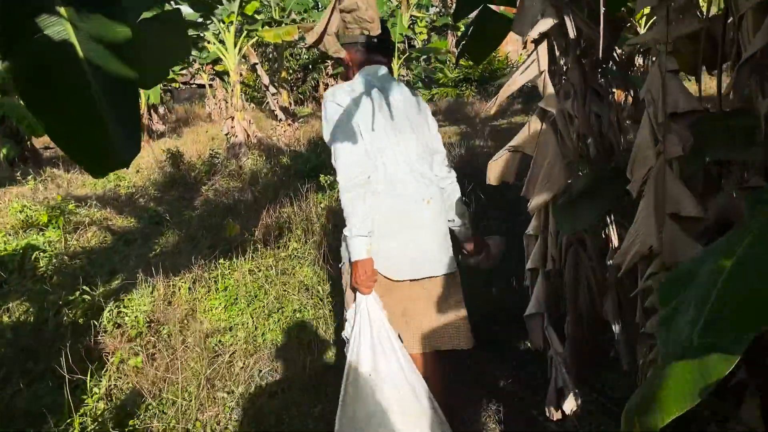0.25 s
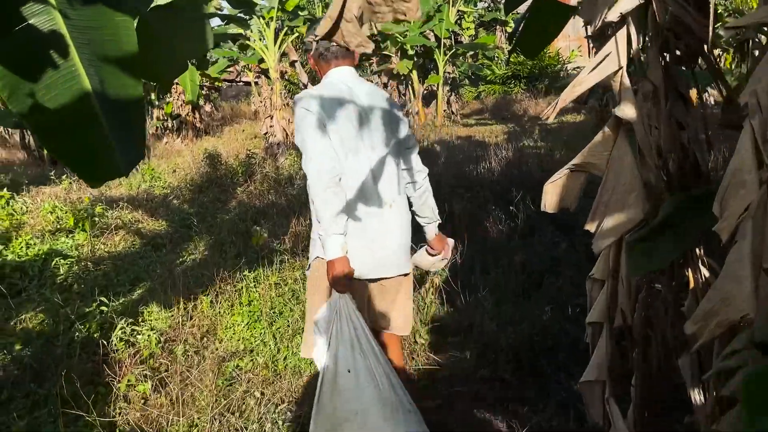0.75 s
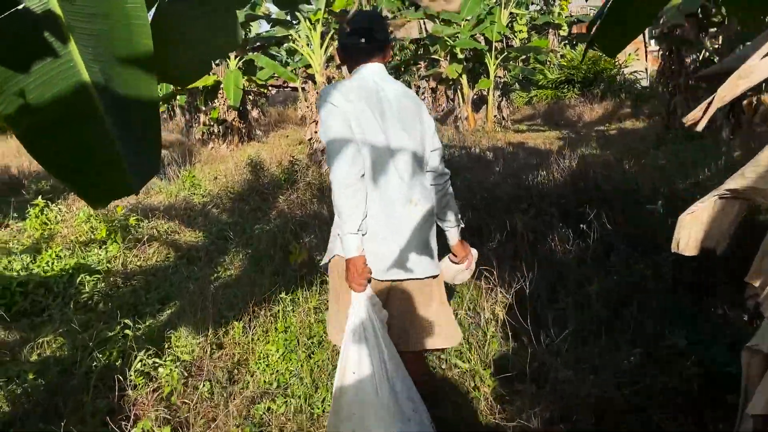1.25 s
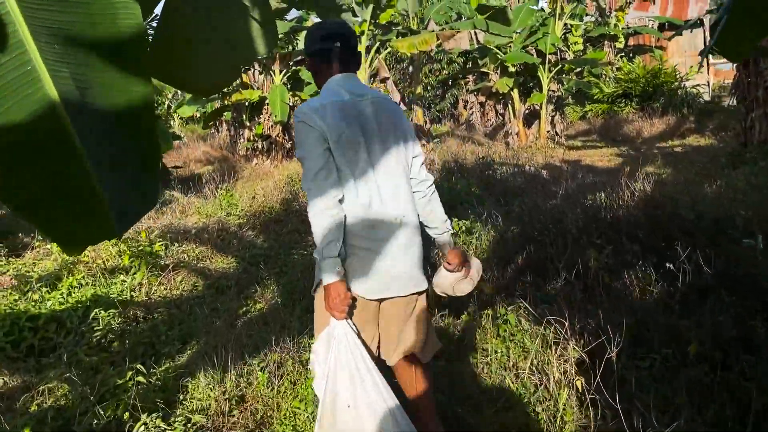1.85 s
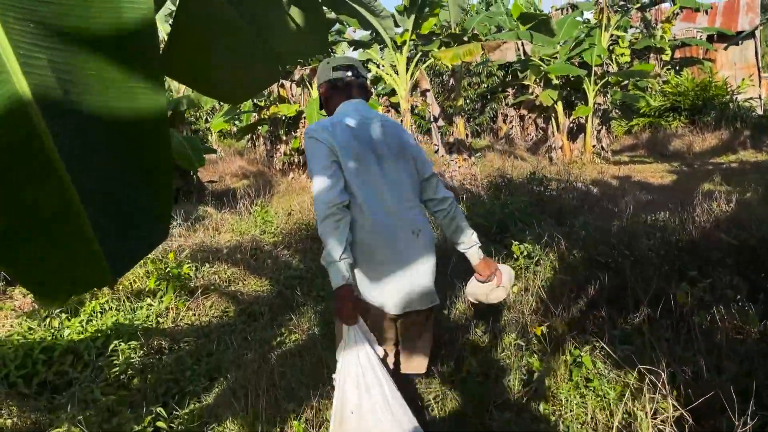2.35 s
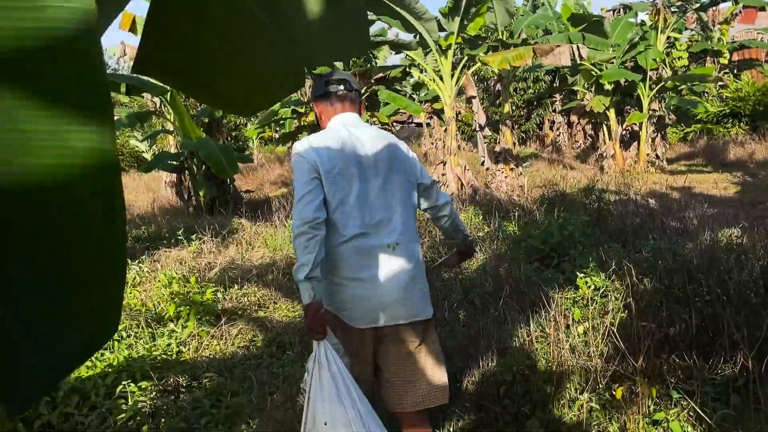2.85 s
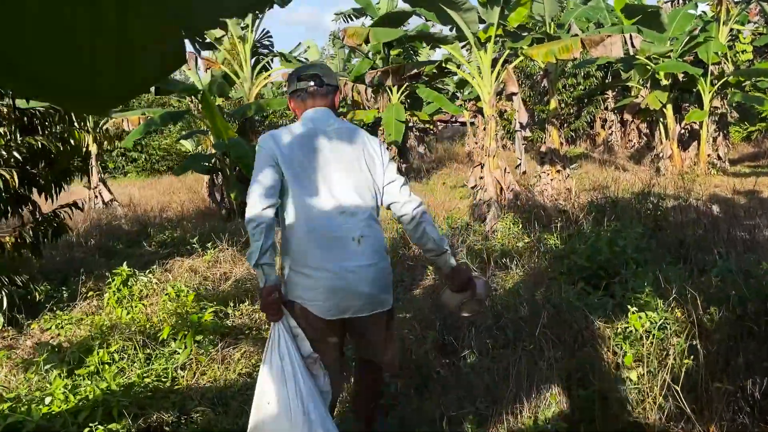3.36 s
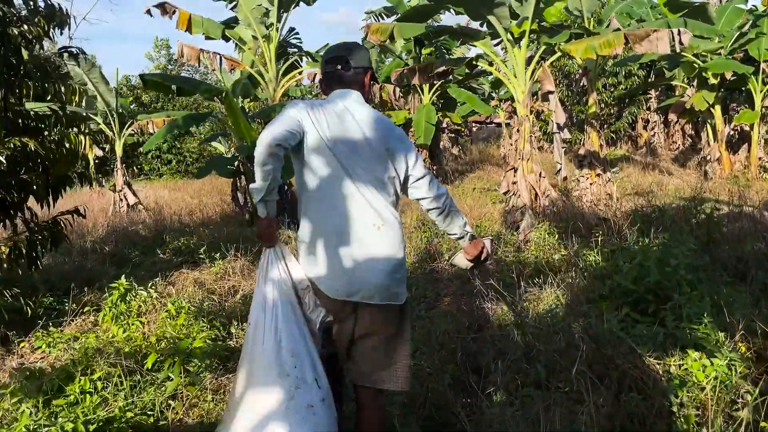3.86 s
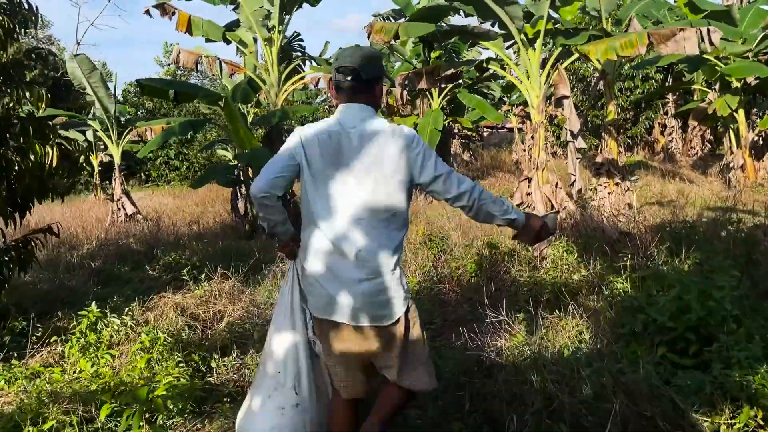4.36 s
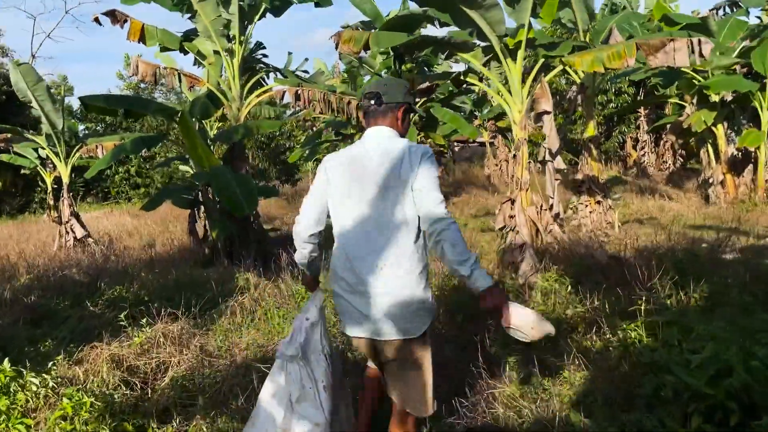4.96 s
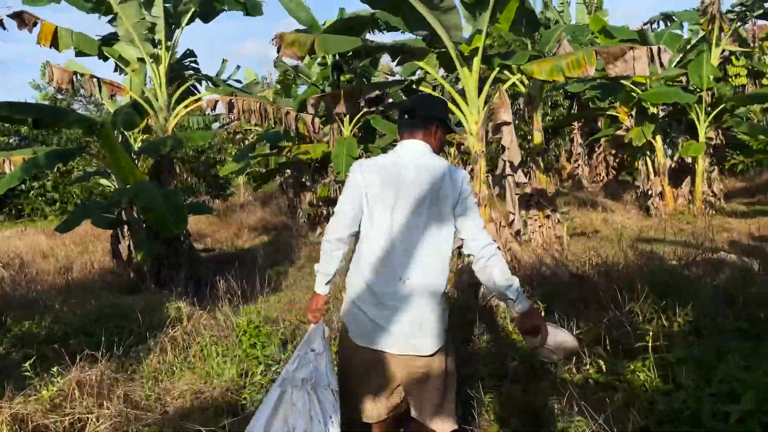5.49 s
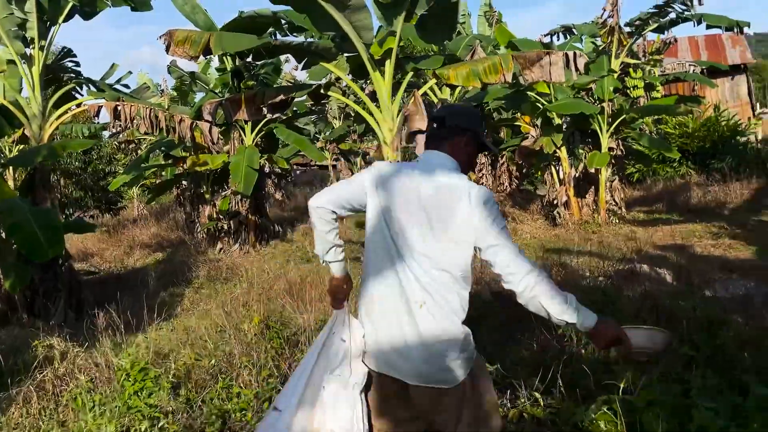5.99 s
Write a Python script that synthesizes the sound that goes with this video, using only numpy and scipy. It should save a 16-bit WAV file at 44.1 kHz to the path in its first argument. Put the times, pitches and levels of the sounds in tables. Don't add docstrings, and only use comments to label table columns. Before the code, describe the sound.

Close outdoor sound of people walking through long grass and dry weeds. A loud burst of crunching and snapping comes first, then uneven steps with swishing blades, brittle cracks and tiny ticks. A dragged woven sack rasps softly, strongest near the middle. Dull heel thumps sit underneath, with wind buffeting the hand-held stereo microphone. A very faint insect chirps in an early lull, and the steps grow quieter later.

```python
import sys
import numpy as np
from scipy import signal
from scipy.fft import rfft, irfft, next_fast_len
from scipy.io import wavfile

SR = 44100
rng = np.random.default_rng(int(sys.argv[2]) if len(sys.argv) > 2 else 0)


def invert_db(level):
    return 10 ** (np.asarray(level, dtype=float) / 20)


def to_wav(sig):
    pcm = np.clip(np.atleast_2d(sig), -1, 1) * 32767
    pcm = np.round(pcm).astype(np.int16)
    wavfile.write(sys.argv[1], SR, pcm.T)


N = 274637
TIME = np.arange(N) / SR
PAD = next_fast_len(N)
HZ = np.fft.rfftfreq(PAD, 1 / SR)

# (t/s, sack level/dB, legs level/dB)
DRAG = [(0, -47.5, -53), (.89, -63, -47), (1.35, -54, -59), (1.55, -65, -60), (1.78, -59.5, -63),
        (2.67, -45.5, -53), (3.56, -55.5, -56.5), (4.45, -58.5, -55), (4.95, -65, -64), (5.34, -61, -68),
        (5.48, -59.5, -69), (5.7, -64.5, -73), (6.23, -61, -62)]
# (t/s, level/dB)
GUSTS = [(0, -42.5), (.1, -75), (.45, -48.5), (.7, -68), (.8, -52.5), (1.4, -56), (1.7, -63), (1.9, -59),
         (2.3, -57.5), (2.58, -47.5), (2.7, -54), (3.05, -63), (3.32, -57), (4.35, -59.5), (4.6, -63),
         (4.86, -56.5), (5.2, -59.5), (5.9, -58), (6.1, -58), (6.23, -60)]


def rms_one(x):
    return x / np.sqrt(np.mean(x ** 2, axis=-1, keepdims=True) + 1e-20)


def in_time(rows):
    s, *columns = np.transpose(rows)
    return [np.interp(TIME, s, c) for c in columns]


def at_hz(points, hz):
    f, value = np.transpose(points)
    return np.interp(np.log(hz + 1), np.log(f), value)


def drift(rate):
    r = np.exp(-80 * np.pi * rate / SR)
    slow = signal.lfilter([1], [1, -2 * r, r * r], rng.standard_normal(N // 40 + 2002))[2000:]
    return np.interp(np.arange(N) / 40, np.arange(len(slow)), rms_one(slow))


def ring(clicks, hz, t60):
    r, w = invert_db(-60 / (t60 * SR)), 2 * np.pi * hz / SR
    return signal.lfilter([0, np.sin(w)], [1, -2 * r * np.cos(w), r * r], clicks + 1e-18)


def colour(x, spectrum):
    return rms_one(irfft(rfft(x, PAD) * invert_db(at_hz(spectrum, HZ)), PAD)[..., :N])


def grains(spectrum, per_s, spread_db, clump_db, flicker_db, smooth):
    chance = rng.random(N) * invert_db(-clump_db * drift(16))
    sizes = invert_db(spread_db * np.minimum(rng.exponential(1, N), 4)) * (chance < per_s / SR)
    clicks = rms_one(sizes * rng.standard_normal((2, N)))
    friction = rng.standard_normal((2, N))
    flicker = invert_db(flicker_db * (drift(13) + drift(36)))
    return colour(flicker * (np.sqrt(1 - smooth) * clicks + np.sqrt(smooth) * friction), spectrum)


def crackle(spectrum, low_hz, high_hz, per_s, cycles, patchy_db, ring_db):
    born = rng.random(N) < per_s * invert_db(4 * drift(12)) / SR
    sizes = born * invert_db(1.14 * np.minimum(rng.exponential(1, N), 3)) * rng.standard_normal((2, N))
    dealt, out = rng.integers(0, 7, N), 0
    for k, hz in enumerate(np.geomspace(low_hz, high_hz, 7)):
        gain = invert_db(at_hz(spectrum, hz) + patchy_db * drift(2.54)) * np.sqrt(hz)
        out = out + gain * rms_one(ring(sizes * (dealt == k), hz, cycles / hz))
    crush = grains(spectrum, 3000, spread_db=2, clump_db=2.5, flicker_db=0.9, smooth=0.61)
    return rms_one(invert_db(ring_db) * rms_one(out) + crush)


def bursts(table, length_s, shape):
    out, t = np.zeros(N + SR), np.arange(int(length_s * SR)) / SR
    for s, peak_db, *settings in table:
        burst, at = shape(t, rng.standard_normal(len(t)), *settings), round(s * SR)
        out[at:at + len(t)] += invert_db(peak_db) * burst / np.max(np.abs(burst))
    return out[:N]


def sing(table):
    out = np.zeros((2, N))
    for s, length, hz, width_hz, db in table:
        at, size = round(s * SR), round(length * SR)
        sung = ring(rng.standard_normal((2, SR // 2)), hz, 2.2 / width_hz)[:, -size:]
        out[:, at:at + size] += invert_db(db) * rms_one(sung) * np.hanning(size) ** 0.23
    return out


def swells(events, steady_db, rise, thin):
    s, db, fade_s, thin_db = np.transpose(events)[..., None]
    fade_s = np.maximum(fade_s, .008)
    coarse = TIME[::32]
    late = (coarse - s) / fade_s
    early = -rise * (1 + 0.021 / fade_s) * late
    loss_db = 10 * np.maximum(late, early) ** 0.96
    power = invert_db(2 * (db + thin * thin_db - loss_db)).sum(axis=0)
    return np.sqrt(invert_db(2 * steady_db) + np.interp(TIME, coarse, power))


def swings(thin):
    # (t/s, level/dB, fade time/s, thinness/dB)
    sweeps = [(0.244, -39.5, 0.12, -2), (0.265, -37.5, 0.024, -2.5), (0.663, -39.5, 0.017, -1),
              (0.69, -41.5, 0.018, -1), (0.148, -41.5, 0.012, -2.5), (2.293, -50, 0.01, -3),
              (0.772, -38.5, 0.013, 6.5), (1.312, -52, 0.08, 1.5), (1.423, -49, 0.019, -0.5),
              (1.627, -48, 0.015, -6), (1.893, -54.5, 0.38, -2), (2.237, -57, 0.41, 2),
              (2.556, -51.5, 0.17, 4.5), (2.973, -41.5, 0.01, 2.3), (3.127, -50.5, 0.22, -0.5),
              (3.423, -55, 0.033, 3), (3.783, -56.5, 0.46, -5), (3.954, -58, 0.027, -4),
              (4.218, -47.5, 0.11, -1), (4.344, -44.5, 0.086, 1), (4.378, -48.5, 0.027, 5),
              (4.715, -51, 0.25, -1), (4.845, -49, 0.042, 3.5), (5.016, -59, 0.025, 7),
              (5.077, -52.5, 0.017, 3.5), (5.211, -65, 0.094, -2.0), (5.287, -55, 0.03, 3),
              (5.516, -50.5, 0.021, 2), (5.649, -50.5, 0.17, 0.5), (5.825, -48, 0.29, 2),
              (5.912, -46.5, 0.046, -2.5), (5.972, -52, 0.018, -8), (6.192, -47.5, 0.085, 6.5)]
    _, legs_db = in_time(DRAG)
    return swells(sweeps, legs_db, rise=1.25, thin=thin)


def steps(thin, drag_lift_db=0):
    # (t/s, level/dB, fade time/s, thinness/dB)
    crushes = [(0.161, -43.5, 0.15, -1), (0.238, -31, 0.055, 0.5), (0.262, -31.5, 0.009, 4),
               (0.394, -42.5, 0.27, 0.5), (0.534, -44, 0.14, -4), (0.573, -36.5, 0.015, -4.5),
               (0.786, -38, 0.22, 0), (1.093, -44.5, 0.092, 0.5), (1.268, -43, 0.16, 2.5),
               (1.416, -49, 0.067, -4), (1.627, -41, 0.029, -0.5), (1.888, -43.5, 0.43, 0.2),
               (2.033, -44.5, 0.035, -2.5), (2.553, -44, 0.12, 0), (3.217, -44, 0.26, -1.5),
               (3.582, -44.5, 0.018, -2), (3.74, -60, 0.38, 10), (4.086, -54, 0.45, -1.5),
               (4.209, -50.5, 0.19, 1), (4.351, -46, 0.13, 2.5), (4.691, -52.5, 0.12, 1),
               (4.824, -45, 0.08, -0.7), (4.862, -50.5, 0.037, -2), (5.037, -51.5, 0.13, 4),
               (5.255, -54.5, 0.12, -1.5), (5.593, -49, 0.095, 2), (5.665, -59.5, 0.073, 10),
               (5.809, -49.5, 0.3, 3.5), (5.955, -49, 0.15, -1.1), (6.156, -48.5, 0.14, 3.5)]
    sack_db, _ = in_time(DRAG)
    return swells(crushes, sack_db + drag_lift_db, rise=1.42, thin=thin)


def swish():
    # (f/Hz, level per Hz/dB)
    spectrum = [(2000, -45), (5000, -1), (7500, 2.5), (10000, 4), (13000, 0), (15700, -5), (16200, -42),
                (17000, -50)]
    blades = grains(spectrum, 900, spread_db=3, clump_db=3.5, flicker_db=1.1, smooth=.7)
    return invert_db(3.5) * swings(thin=0.73) * blades


def rustle():
    # (f/Hz, level per Hz/dB)
    spectrum = [(1200, -1.5), (2500, -4), (3200, 0.5), (4500, 1), (6000, -3), (7500, -13.5), (11000, -22)]
    strength = np.hypot(swings(thin=-1.23), invert_db(-9.5) * steps(thin=0.77))
    return invert_db(0.5) * strength * crackle(spectrum, 2650, 6700, 2500, cycles=22, patchy_db=3, ring_db=-2)


def twigs():
    # (f/Hz, level per Hz/dB)
    spectrum = [(700, -37), (1200, -2), (1500, -1), (1750, -2.5), (2300, 1), (2800, -11), (3800, -19.5)]
    strength = invert_db(-0.74) * steps(thin=1.2, drag_lift_db=0.5)
    return strength * crackle(spectrum, 1053, 2960, 1500, cycles=19, patchy_db=4.5, ring_db=-0.5)


def stalks():
    # (f/Hz, level per Hz/dB)
    spectrum = [(200, -28), (350, -2), (480, -3.5), (620, -3), (900, 3), (1200, -4.5), (1600, -8),
                (2400, -18.5)]
    strength = invert_db(0.5) * steps(thin=-0.59)
    return strength * crackle(spectrum, 316, 1650, 900, cycles=6.2, patchy_db=1.5, ring_db=-2.5)


def snap(t, noise, hz, crack_db):
    splinters = (noise * np.abs(noise) + 14 * (t == 0)) * invert_db(-60 * t / 0.033)
    band = signal.butter(2, [1000, 4000], "band", fs=SR, output="sos")
    bright = signal.sosfilt(band, splinters)
    hollow = ring(splinters, hz, 10 / hz) + invert_db(-11) * ring(splinters, 3.05 * hz, 6.5 / hz)
    return hollow / np.abs(hollow).max() + invert_db(crack_db + 11) * bright / np.abs(bright).max()


def crack(t, noise, hz, t60):
    turns = hz * (t + .7 * .0012 * (1 - np.exp(-t / .0012)))
    return (np.sin(2 * np.pi * turns) + .15 * noise) * invert_db(-60 * t / t60)


def tick(t, noise, tilt_db):
    spray = np.diff(noise * invert_db(-60 * t / .011), prepend=0)
    hz = np.fft.rfftfreq(len(t), 1 / SR) + 300
    return irfft(rfft(spray) * invert_db(tilt_db * np.log2(hz / 9000)), len(t))


def jolt(t, noise, hz, t60):
    turns = hz * (t + 0.0019 * (1 - np.exp(-t / 0.0058)))
    return np.sin(2 * np.pi * turns) * (1 - np.exp(-t / 0.0059)) * invert_db(-60 * t / t60)


def scatter(x):
    t = np.arange(int(0.038 * SR)) / SR
    echoes = rng.standard_normal(len(t)) * invert_db(-60 * t / 0.041)
    return signal.fftconvolve(x, echoes / np.linalg.norm(echoes))[:N]


def hits():
    # (t/s, peak level/dB, pitch f/Hz, crack level/dB)
    snaps = [(.088, -29, 3260, -18), (.143, -34, 1520, -5), (.216, -34, 2380, -13), (.238, -18, 880, -10),
             (.572, -22.5, 926, -24), (.6585, -30, 800, -7), (.71, -22, 990, -18), (.769, -31, 1220, -23.5),
             (.969, -26, 1080, -20), (1.159, -33, 755, -6), (1.248, -24, 2200, -14),
             (1.623, -22.5, 730, -11.5), (2.14, -41, 2000, -14), (2.2155, -31.5, 900, -17),
             (2.541, -29, 990, -18.5), (2.575, -31, 896, -18), (2.607, -21, 1820, -6),
             (3.102, -25.5, 1300, -23), (3.158, -29, 1040, -15), (3.776, -28, 2300, -9),
             (4.207, -20, 1820, -12), (4.353, -37, 1310, -2), (4.814, -29, 1450, -19),
             (5.043, -25, 2300, -27), (5.206, -25.5, 780, -4.5), (5.58, -25, 1400, -12),
             (5.659, -29.5, 1840, -32), (6.147, -25, 1450, -18), (6.192, -28.5, 1370, -13)]
    # (t/s, peak level/dB, settling f/Hz, t60/s)
    cracks = [(.515, -36, 970, .01), (.5715, -26, 910, 0.013), (.585, -28, 1200, .01),
              (.659, -29, 2200, 0.006), (.7695, -25, 1110, 0.018), (1.055, -41, 960, .01),
              (1.143, -34, 2530, 0.011), (1.219, -33, 1120, .012), (1.2485, -25, 1900, 0.0093),
              (1.253, -34, 3200, .008), (1.334, -40, 1600, .01), (1.419, -34, 1000, 0.012),
              (1.543, -35, 920, 0.012), (1.6385, -35, 2160, 0.012), (1.645, -31, 2040, 0.02),
              (1.685, -37, 1300, .01), (1.907, -30, 1000, .01), (2.14, -40, 1810, .008),
              (2.157, -35, 1000, 0.0088), (2.184, -42, 1000, .008), (2.216, -31, 910, 0.01),
              (2.292, -40, 2000, .008), (2.963, -31, 1110, .01), (3.037, -39, 1900, .01),
              (3.179, -35, 900, .01), (3.461, -32, 1210, .01), (3.878, -36, 1050, 0.013),
              (3.941, -39, 1830, 0.0092), (4.121, -37, 880, .01), (4.17, -38, 1010, 0.0092),
              (4.638, -39, 2040, .01), (4.716, -37, 1520, .01), (4.856, -35, 1190, .01),
              (4.963, -41.5, 2000, .01), (4.987, -37, 1200, .01), (5.095, -38, 2360, .01),
              (5.2065, -37, 1020, 0.0059), (5.218, -39, 1500, .008), (5.254, -39, 990, .012),
              (5.298, -40, 1500, .008), (5.378, -46, 3500, .008), (5.398, -37, 1000, .008),
              (5.47, -44, 1965, 0.014), (5.478, -43, 3600, .008), (5.51, -42, 1800, .01),
              (5.647, -38, 2340, .01), (5.82, -37, 1200, .008), (5.95, -36, 940, .01),
              (5.974, -31, 940, .01), (6.044, -35, 3140, .01)]
    # (t/s, peak level/dB, tilt per octave/dB)
    ticks = [(0.0832, -29, -3), (0.1174, -32, 0), (0.1435, -22.5, -5), (0.5162, -33, -3), (0.6569, -39, 2),
             (0.6903, -34, 0), (0.7183, -28, 2), (0.7703, -18, -1), (1.033, -35, 4), (1.6226, -39, 9),
             (1.9744, -27.5, -3), (2.0256, -24.5, 1), (2.09, -29, 0), (2.139, -29.5, -1), (2.219, -31, -12),
             (2.4678, -30, -5), (2.4853, -26, 4), (2.716, -30, 3), (2.971, -18.5, 10), (3.4595, -26, 7),
             (3.7908, -29.5, -4.5), (3.9434, -29.5, -6), (4.2572, -28, 0), (4.289, -24.5, 0),
             (4.586, -31, 1), (5.2168, -29, 2), (5.3605, -30, 2), (5.8302, -24, 3), (6.128, -28, -1),
             (6.1905, -24, -1)]
    # (t/s, peak level/dB, f/Hz, t60/s)
    jolts = [(0.206, -35, 105, 0.14), (0.363, -30.5, 56, 0.032), (0.494, -34, 256, 0.047),
             (0.572, -49, 166, 0.043), (0.806, -37, 99, 0.074), (1.623, -30.5, 248, 0.034),
             (1.929, -33, 135, 0.023), (2.485, -24, 53.4, 0.086), (2.555, -28, 87, 0.096),
             (2.59, -24, 103.4, 0.077), (3.113, -40, 83, 0.15), (3.24, -39, 273, 0.1),
             (3.516, -35, 210, 0.028), (3.978, -32, 187, 0.02), (4.13, -31, 217, 0.031),
             (4.848, -33, 191, 0.054), (4.81, -39.5, 142, 0.06), (5.207, -36, 196, 0.045),
             (5.253, -37.5, 216, 0.045), (5.389, -41, 125, 0.029), (5.653, -41, 86.1, 0.062),
             (6.15, -38, 113, 0.055)]
    direct = invert_db(-3.5) * bursts(snaps, .08, snap) + bursts(cracks, .03, crack)
    direct = direct + invert_db(4.5) * bursts(ticks, .012, tick) + invert_db(-4.5) * bursts(jolts, .15, jolt)
    return np.array([direct, scatter(direct)])


def creaks():
    # (t/s, length/s, f/Hz, width/Hz, level/dB)
    creak_table = [(0.214, 0.012, 2170, 430, -31.5), (.228, 0.0059, 1670, 370.4, -28),
                   (.236, .024, 900, 440, -25), (.26, .014, 2400, 430, -34), (0.29, .008, 1080, 463, -41),
                   (0.769, 0.011, 1200, 600, -34.5), (0.815, .014, 1000, 500, -38),
                   (4.81, .02, 1310, 600, -46), (4.836, 0.038, 890, 600, -48),
                   (5.587, .012, 1400, 500, -47), (5.931, .065, 990, 800, -48)]
    return sing(creak_table)


def sack():
    # (t/s, length/s, f/Hz, width/Hz, level/dB)
    rubs = [(4.665, .08, 3750, 220, -54), (4.745, .08, 3750, 220, -56), (4.825, .09, 3700, 220, -55),
            (5.0, .05, 2300, 500, -52), (6.19, .006, 5300, 500, -44), (4.78, .11, 800, 600, -49),
            (5.325, .005, 3600, 600, -48), (5.362, .005, 4100, 600, -51), (6.192, .008, 1300, 300, -34),
            (4.52, .38, 2150, 130, -55), (4.99, .13, 2900, 1200, -54), (4.18, .05, 1700, 300, -49),
            (4.24, .17, 2150, 200, -57), (2.18, .3, 2100, 400, -55)]
    return sing(rubs)


def tread():
    # (f/Hz, level per Hz/dB)
    spectrum = [(70, -10), (130, 1.5), (200, 0.5), (320, 1.5), (450, -3), (800, -34)]
    gust_db, = in_time(GUSTS)
    weight = np.hypot(invert_db(-20) * steps(thin=-2.5) ** 0.69, invert_db(gust_db - 2))
    return weight * grains(spectrum, 150, spread_db=3.5, clump_db=-0.5, flicker_db=1.8, smooth=1)


def rumble():
    # (f/Hz, level per Hz/dB)
    spectrum = [(20, -21), (32, -31), (48, 3), (80, 4), (120, -3), (170, -7), (300, -40)]
    gust_db, = in_time(GUSTS)
    wind = grains(spectrum, 60, spread_db=3.5, clump_db=1, flicker_db=1.5, smooth=0.81)
    return invert_db(gust_db + 3) * wind


def insect():
    # (t/s, length/s, f/Hz, width/Hz, level/dB)
    chirps = [
        (1.475, .022, 5500, 150, -59),
        (1.518, .016, 5500, 120, -55),
        (1.54, .012, 5550, 150, -57),
        (1.592, .018, 5500, 120, -54),
        (1.68, .1, 5500, 100, -59),
        (1.82, .08, 5500, 100, -60),
    ]
    return sing(chirps)


def ports(field):
    # (f/Hz, likeness from 0 to 1)
    likeness = [(60, 0.94), (300, 0.94), (1200, 0.85), (1800, 0.66), (3000, 0.55), (4500, 0.75),
                (5500, 0.45), (7000, 1), (8000, 0.85), (16000, 0.97)]
    # (f/Hz, difference/dB)
    left_gain = [(60, 1), (330, 1), (900, -1), (1500, 0.5), (2300, -2), (3200, 3.5), (4800, 0.9), (6400, 2),
                 (8000, 0)]
    # (f/Hz, lead/half turns)
    right_lead = [(0, 0), (2200, 0), (3000, -.18), (3900, 0), (5300, -.26), (6500, .28), (8150, 1),
                  (11650, 2), (15100, 3), (18500, 4)]
    direct, scattered = rfft(field, PAD)
    alike = np.clip(at_hz(likeness, HZ), 0, 1)
    lead = np.exp(.5j * np.pi * np.interp(HZ, *np.transpose(right_lead)))
    lean = invert_db(at_hz(left_gain, HZ) / 2)
    mid = np.sqrt((1 + alike) / 2) * direct
    side = np.sqrt((1 - alike) / 2) * scattered
    return irfft(np.array([(mid + side) * lean / lead, (mid - side) * lead / lean]), PAD)[:, :N]


def scene():
    plants = swish() + rustle() + twigs() + stalks() + hits() + creaks()
    return ports(plants + sack() + tread() + rumble() + insect())


def low_pass(x):
    return signal.sosfilt(signal.butter(12, 16510, fs=SR, output="sos"), x)


def record(dry):
    mix = signal.sosfilt(signal.butter(2, 38, "high", fs=SR, output="sos"), dry)
    return low_pass(mix)


dry = scene()
out = record(dry)
to_wav(out)
```